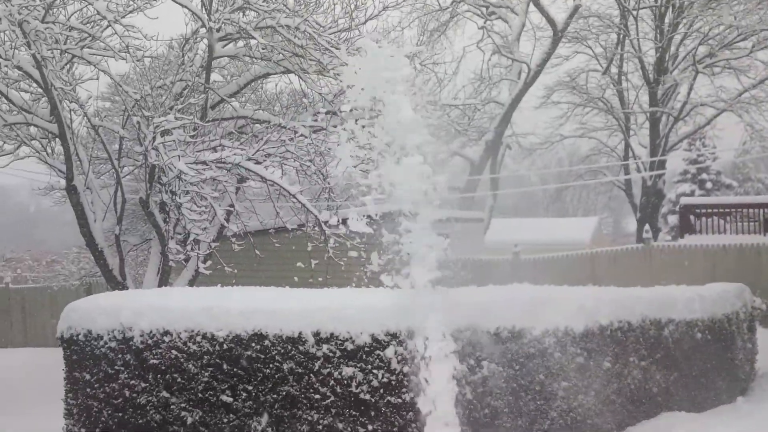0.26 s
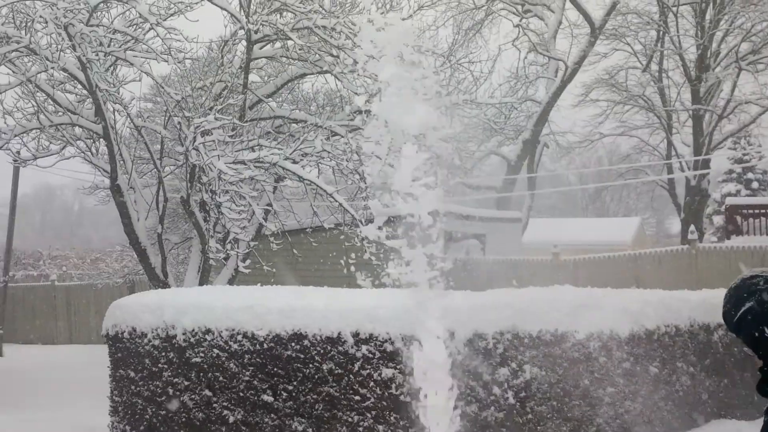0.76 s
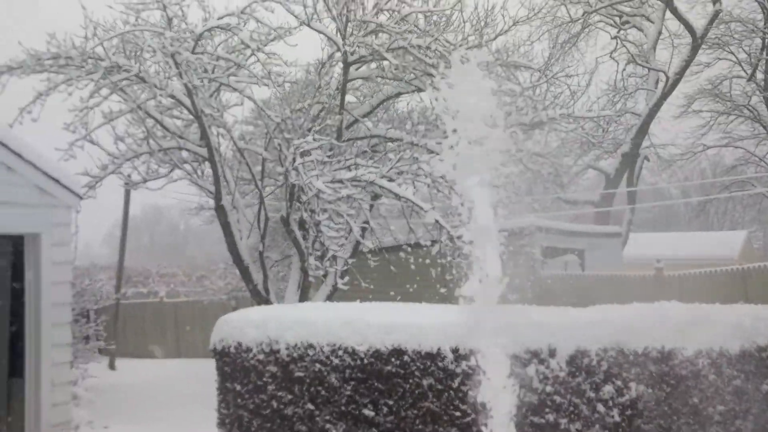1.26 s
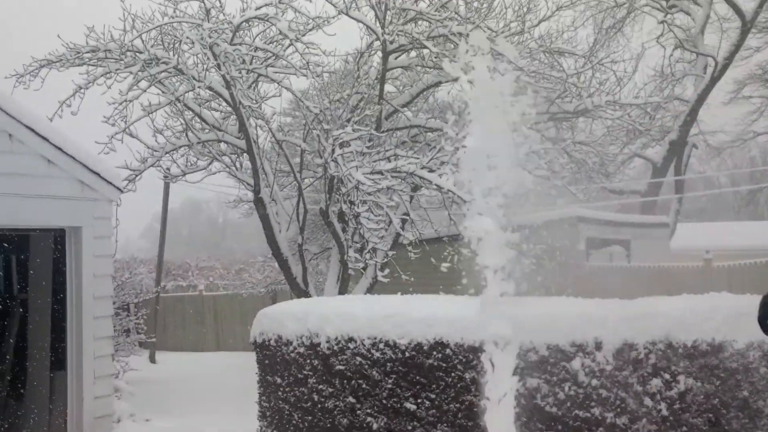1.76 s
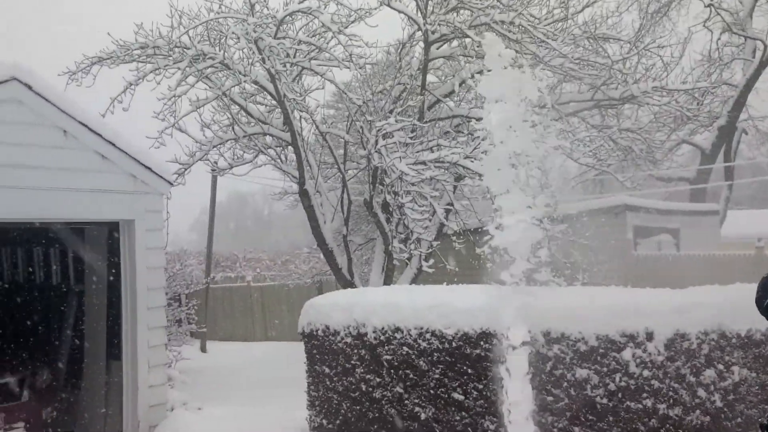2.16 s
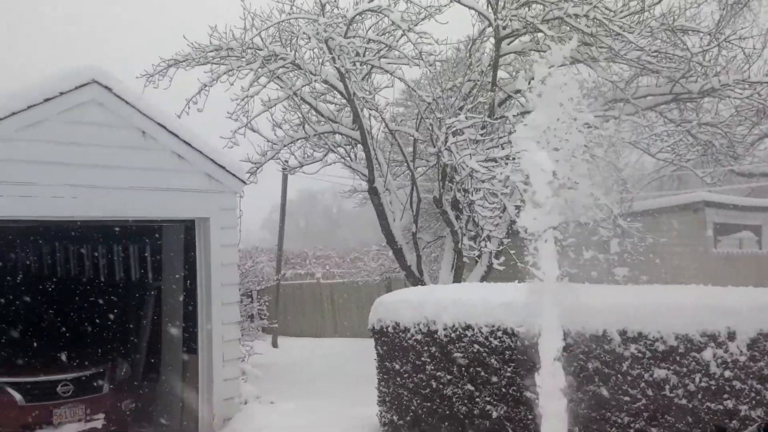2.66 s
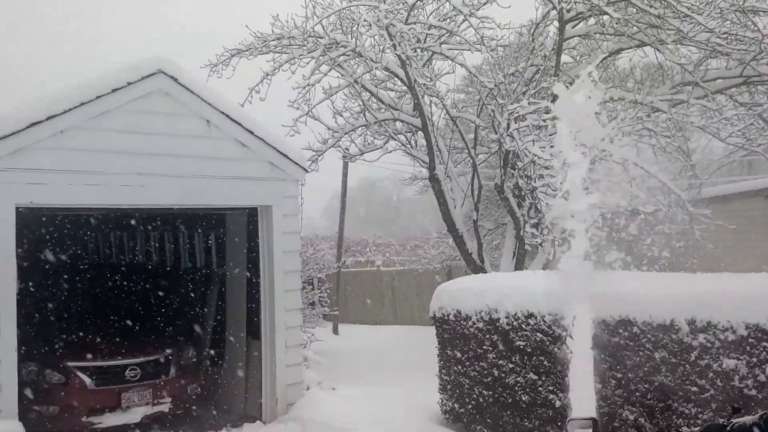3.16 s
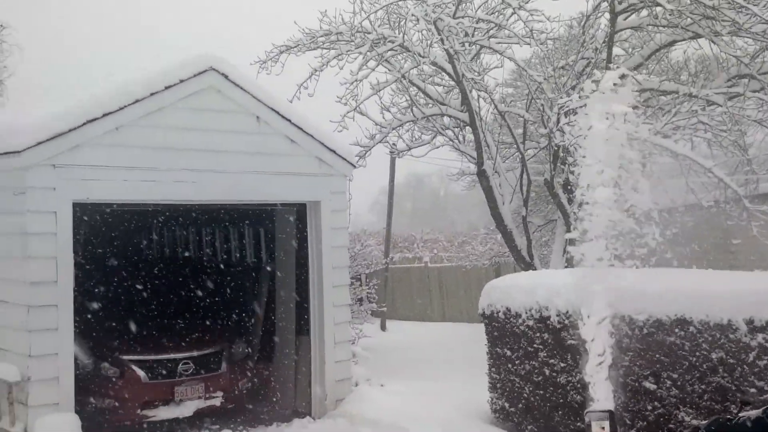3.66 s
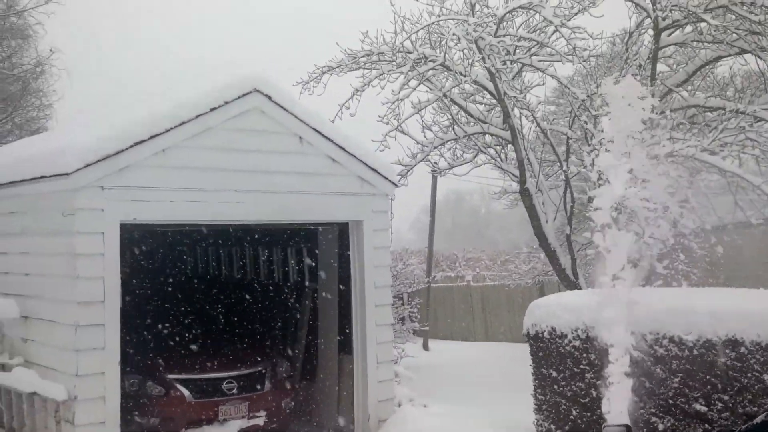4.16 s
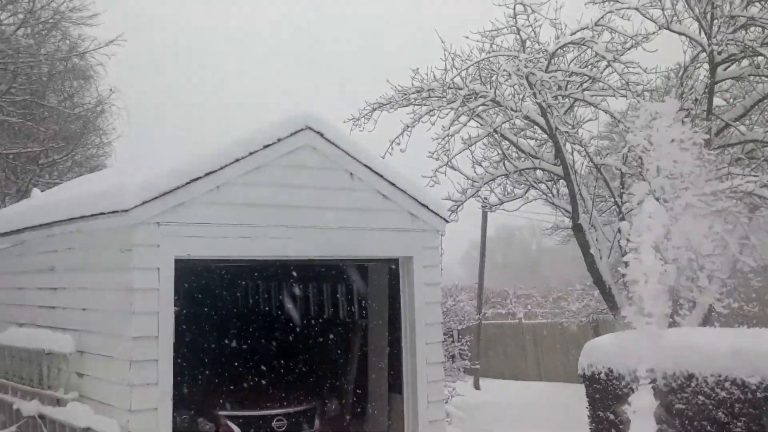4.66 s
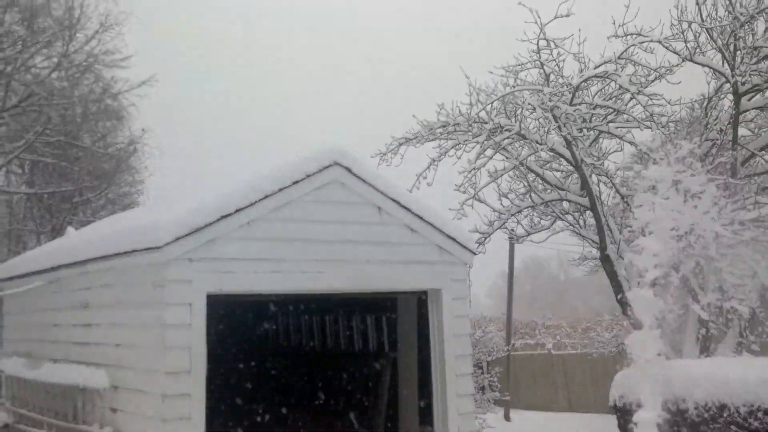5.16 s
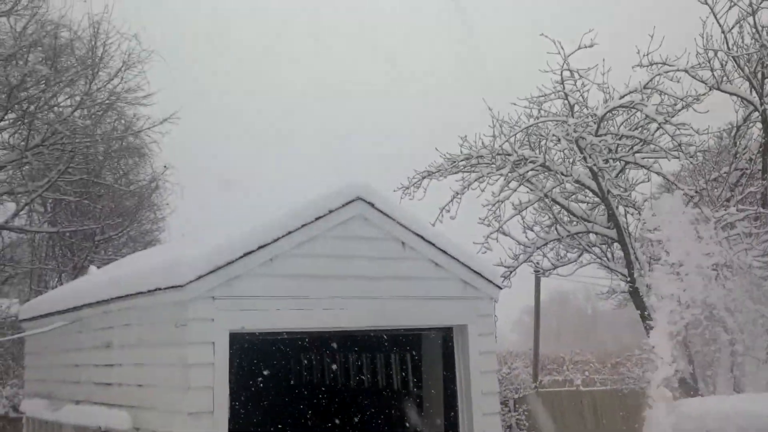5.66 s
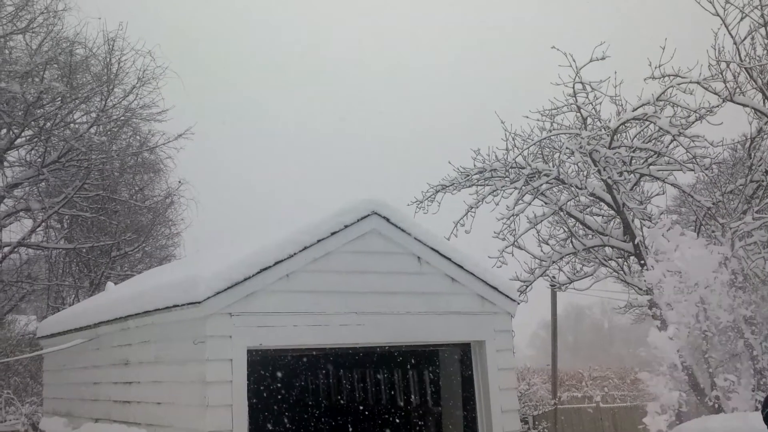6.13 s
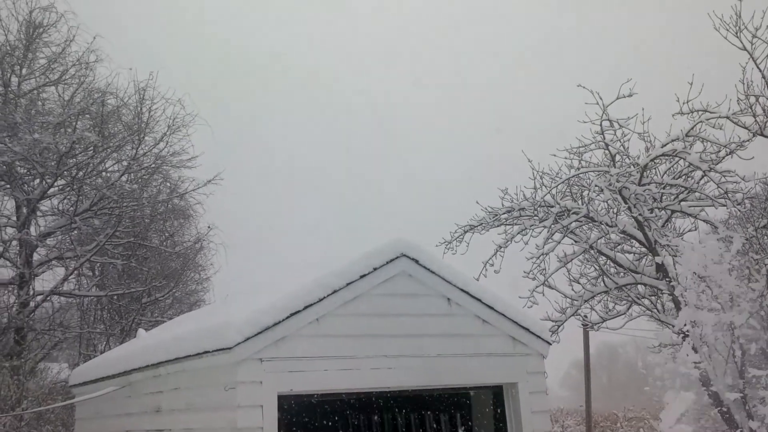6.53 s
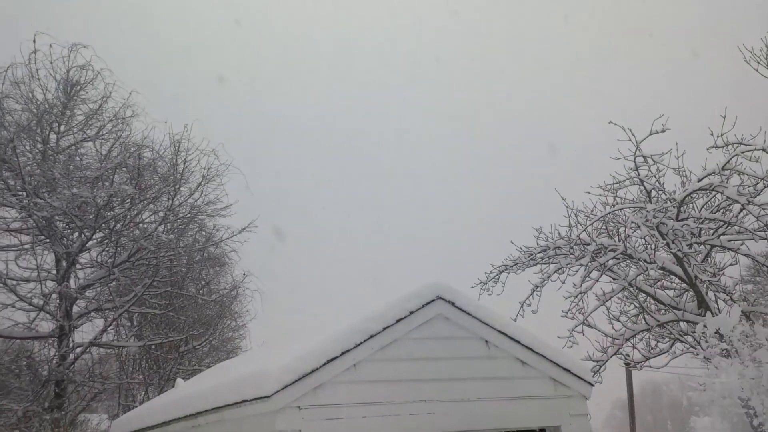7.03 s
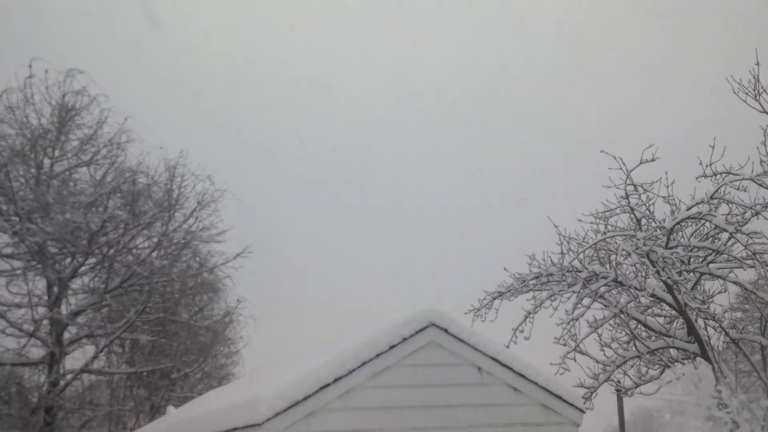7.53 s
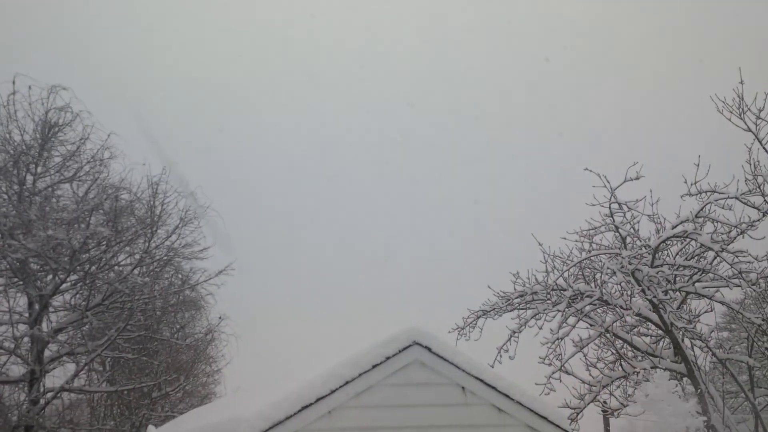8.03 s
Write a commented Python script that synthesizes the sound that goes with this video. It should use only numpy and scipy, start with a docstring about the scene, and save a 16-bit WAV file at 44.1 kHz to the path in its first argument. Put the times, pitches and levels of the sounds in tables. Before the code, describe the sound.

From 0 to 8.3 seconds a small one-cylinder petrol snowblower runs without a break at about 3500 revolutions per minute, roughly 29 exhaust beats per second, merging into a rough buzzing drone with strong low harmonics. Over it lie a pulsing roar of gas and thrown snow, hollow muffler ringing, tailpipe pops, loose casing clatter, midrange hiss and very faint high fizz. In the first two seconds irregular hard knocks and metallic clangs poke out; low rumble swells near 0.5 and 2.2. Around 3.9 and 4.1 seconds clumps of snow bump the right microphone with loud dull thuds. From 4 to 6 seconds the hand-held phone turns away: tone shifts, tailpipe pops weaken then return near the end, and the level sinks gradually, about five decibels overall. Tiny crisp snow ticks are scattered throughout. The engine sits left of centre, outdoors, and is still running at the end.

```python
"""Snowblower in a snowy yard

A one-cylinder four-stroke machine works beside a hand-held phone that slowly turns away.
The exhaust thumps once in two turns as a harmonic series; pulses and knocks ring modes of muffler, casing
and covers; shaped noise makes the roar of gas and snow, the hiss, a wavering low rumble and the fizz.
Grains of snow tick on the phone as band-passed bursts; clumps push the diaphragm of its right port."""
import sys
import numpy as np
from scipy import signal
from scipy.io import wavfile
from scipy.ndimage import uniform_filter1d

SR = 44100
rng = np.random.default_rng(int(sys.argv[2]) if len(sys.argv) > 2 else 0)


def output_pcm(signal):
    """Save a mono or channel-first signal as 16-bit PCM at the path in sys.argv[1].

    Samples are clipped to [-1, 1] before scaling.
    """
    pcm = np.clip(np.atleast_2d(signal).T, -1, 1) * 32767
    wavfile.write(sys.argv[1], SR, np.round(pcm).astype(np.int16))


N = 365588
T = np.arange(N) / SR

# crank speed: time_s, speed_rpm
CRANK_SPEED = [(0.0, 3415.9), (0.31, 3508.3), (0.73, 3544.0), (0.83, 3484.4), (1.32, 3521.3),
               (1.93, 3515.7), (2.33, 3535.2), (2.97, 3532.7), (3.55, 3517.5), (3.86, 3556.6),
               (4.03, 3477.5), (4.38, 3524.8), (5.13, 3518.4), (6.35, 3539.8), (7.03, 3535.5),
               (7.43, 3548.3), (8.3, 3545.2)]
FIRST_CYCLE = .567  # share of a cycle gone since the last exhaust pulse at 0 s
# engine loudness: time_s, level_db
ENGINE_LEVEL = [(0, -18), (1.4, -18.5), (2.5, -19.5), (3.8, -20), (4.1, -21), (5.2, -21), (6.7, -22.5),
                (8.3, -23.5)]
# turning of the phone: time_s, share_turned_away (0-1)
TURN_AWAY = [(0, 0.02), (2, 0), (4, 0.15), (6, 0.75), (8.3, 0.75)]

# exhaust thump, facing and away: multiple_of_firing_rate, level_db
THUMP_NEAR = [(1, -14), (2, -6), (3, -15), (4, 0), (5, -3), (6, -14), (7, -15), (8, -12), (9, -16)]
THUMP_AWAY = [(1, -15), (2, -5), (3, -13), (4, 0), (5, -4), (6, -13), (7, -12), (8, -8), (9, -14)]
# upper shaft orders that hum: multiple_of_firing_rate
HUM_ORDERS = [10, 11, 15, 16, 18, 20, 21, 22, 24, 26, 27, 29, 30, 44]
# their levels, row for row: facing_db, away_db
HUM_LEVELS = [(-13.5, -17.5), (-28, -21.5), (-18, -26.5), (-17, -24.5), (-15, -26.5), (-21.5, -26.5),
              (-30.5, -17.5), (-19.5, -19.5), (-25.5, -24.5), (-32.5, -11), (-19.5, -43), (-18.5, -29.5),
              (-24, -24.5), (-22, -24)]
# modes of muffler and sheet metal: pitch_hz, t60_s, facing_db, away_db
MUFFLER_MODES = [(459, .06, -21, -37), (528.5, .075, -21, -29), (639.5, 0.052, -23.5, -25),
                 (758, .045, -25, -21), (890, 0.049, -23, -22.5)]
FIRING_SHARE = .3  # size of the firing stroke's blow on the muffler beside the exhaust pulse
PIPE_HZ, PIPE_T60_S, PIPE_SPREAD_DB = 1300, .028, 2.2  # tailpipe pop before detuning, and its unevenness
# tailpipe pop: time_s, level_db
PIPE_LEVEL = [(0, -9.5), (1.5, -7.5), (2.5, -7), (4, -8.5), (4.6, -12.5), (6, -23), (8.3, -9)]
DETUNE = .014  # share by which loose sheet metal rings sharp or flat from stroke to stroke

# roar spectrum, facing and away: frequency_hz, relative_level_db (per Hz)
ROAR_NEAR = [(38, -30), (65, -21), (129, -11), (194, -9.5), (288, -2), (389, -21), (452, -12), (525, -5),
             (578, -9), (871, -9.5), (1130, -14.5), (1310, -16.5), (1480, -24), (1700, -18), (2210, -57.5),
             (3740, -120)]
ROAR_AWAY = [(38, -34), (65, -18.5), (134, -2.5), (189, -8), (265, -7.5), (394, -34.5), (465, -8),
             (555, -14.5), (636, 3), (709, -26), (770, -9), (984, -21.5), (1390, -12), (1700, -31),
             (2210, -70.5), (3740, -120)]
# valve and piston knocks: share_of_cycle (after the exhaust pulse), level_db, tilt_db_per_octave
KNOCKS = [(.1, -3, -7), (.22, -7, -2), (.36, -6, -4), (.54, -4, -12), (.62, -3, -3), (.67, 0, 0),
          (.72, 0, 4), (.8, -6, 6), (.95, -7, 3)]
# casing modes: pitch_hz, base_t60_s, facing_db, away_db
CASING_MODES = [(1640, .025, -4, -12), (1790, .028, -2, -10), (1955, .032, 0, 1), (2230, .02, -7, -19),
                (2519, .034, -4, -2), (2700, .022, -7, -16), (3050, .02, -12, -20), (3248, .032, -8.5, -7),
                (3450, .022, -11, -19), (3640, .036, -12, -9)]
# casing ring within the clatter: time_s, level_db
CASING_LEVEL = [(0, -3), (1.8, -3), (2.2, -5), (3.6, -5), (4.1, -1.5), (5.4, -1.5), (6, -3), (8.3, -3)]
# hiss spectrum, facing and away: frequency_hz, relative_level_db (per Hz)
HISS_NEAR = [(1100, -32), (1500, -4), (2000, 1.5), (2280, -2.5), (2500, -5), (2900, -11), (3200, -9),
             (3650, -13.5), (3950, -24), (4300, -25), (4700, -51)]
HISS_AWAY = [(1100, -30.5), (1500, -21), (1950, 5.5), (2200, -9), (2500, 4.5), (2900, -11.5), (3200, -2),
             (3650, -12), (3950, -23.5), (4300, -28.5), (4700, -47.5)]
# low rumble relative to the engine: time_s, level_db
RUMBLE_LEVEL = [(0, -10.5), (.3, -10.5), (.55, -6.5), (.9, -8.5), (1.4, -12), (1.9, -11.5), (2.2, -6),
                (2.5, -8), (2.8, -15.5), (3.6, -13.5), (4.5, -13.5), (6, -17), (7.2, -13.5), (8.3, -14.5)]
RUMBLE_WAVER_DB = 2  # slow random waver, rms
# fizz spectrum, facing and away: frequency_hz, relative_level_db (per Hz)
FIZZ_NEAR = [(3000, -41.5), (3900, -2.5), (4700, -3.5), (5150, -2.5), (5450, -0.5), (5750, -1),
             (6100, -3.5), (6900, -4.5), (7500, -18.5), (8300, -8.5), (9500, -16.5), (10300, -31.5),
             (12600, -33.5), (13600, -59.5)]
FIZZ_AWAY = [(3000, -24.5), (3900, 2.5), (4700, 1), (5150, -0.5), (5450, 6.5), (5750, -2), (6100, -0.5),
             (6900, -10.5), (7500, -23.5), (8300, -21), (9500, -27), (10300, -21), (12600, -29),
             (13600, -60.5)]
# modes of the thin covers: pitch_hz, t60_s, level_db
COVER_MODES = [(4700, 0.024, -15), (5460, 0.095, 0), (6760, 0.023, -1), (8220, 0.0069, 5)]
# time_s, clatter_db and fizz_db (relative to the engine), treble_db (highest treble within the fizz)
BRIGHTNESS = [(0, -20, -45, 2.5), (1.9, -19.5, -45, 2.5), (2.1, -18.5, -46, -4), (2.6, -18.5, -47, 1.5),
              (3.6, -16.5, -44, 3.5), (3.9, -19.5, -47.5, 2), (4.7, -20.5, -46.5, -1.5),
              (6, -22, -47, -0.5), (8.3, -23, -46.5, 2.5)]
TREBLE_HZ = 7500

# outstanding knocks of the firing stroke: start_s, level_db (relative to the engine)
HARD_KNOCKS = [(0.039, -25), (.178, -36), (.419, -28), (.487, -28), (0.522, -27), (0.931, -21.5),
               (.965, -27), (1.067, -26), (1.136, -26), (1.272, -25), (1.375, -27), (1.614, -27),
               (3.282, -29)]
HARD_TILT_DB = 18  # per octave, favours the upper cover modes
HIGH_NOISE_DB, HIGH_NOISE_T60_S, HIGH_NOISE_RISE_S = 0, 0.027, 0.0072
# strokes that clang on the casing: start_s, peak_db (before the port balance)
CLANGS = [(0.138, -34), (0.2129, -37), (0.381, -32), (0.687, -31), (0.8569, -43), (0.9297, -26),
          (0.9637, -40), (1.027, -30.5), (1.1687, -31), (1.3017, -27), (1.3757, -30), (1.4076, -30),
          (1.4426, -38), (1.5798, -43), (1.8142, -36), (1.9499, -31), (2.0534, -25.5), (3.5149, -46),
          (3.991, -30.5), (4.0277, -31), (4.1659, -31), (4.2028, -38), (4.335, -33), (4.4029, -33),
          (4.6742, -30), (5.1222, -31), (5.7627, -32)]
CLANG_TILT_DB = 17  # per octave, favours the upper casing modes

# grains of snow on the phone, and at 3.888 s the broadband click of the clump that strikes the right port:
# centre_s, level_db, pitch_hz, spread_octaves, left_right_db
GRAINS = [(.986, -56, 9500, .5, -5), (1.002, -46, 11000, .9, -5), (1.008, -52, 9500, .7, -5),
          (1.294, -42, 10500, 1, 2), (1.308, -50, 10700, .4, 10), (3.092, -61, 10000, .8, 5),
          (3.112, -53, 11300, 0.22, 9), (3.888, -48, 8000, 1.6, -6), (4.765, -43, 9350, 0.47, -12),
          (4.923, -56, 12000, .9, -4), (5.266, -45, 7740, .9, -6), (5.293, -62, 8500, 0.32, -3),
          (6.329, -54, 9930, 0.44, -6), (6.856, -54, 8550, 0.19, -7), (6.866, -51, 10500, 0.37, -7),
          (6.872, -59, 10000, .5, -3), (6.882, -59, 10500, .6, -1), (7.767, -51, 10800, .6, 2),
          (8.204, -53, 10300, 0.55, -4)]
# Gaussian widths of the tick and of the soft faint noise, mostly after it
TICK_S, FAINT_NOISE_S, FAINT_NOISE_DB = .0014, .009, -17
# clumps on the right port: start_s, level_db, rise_s (scale of the push), shell_db (ring of the phone shell)
TAPS = [(3.8856, -7, .0003, -38), (3.8874, -.5, .00013, -29), (4.1312, -11, .0004, -31),
        (4.1336, -.5, .00015, -20.5)]
# phone shell modes: pitch_hz, t60_s, level_db
SHELL_MODES = [(2720, .007, -11), (3270, .014, -2.5), (3720, .009, -9), (5340, .006, -19),
               (7000, .005, -26), (9000, .005, -26), (11500, .005, -26)]

# level of the left port over the right, facing and away: frequency_hz, left_right_db
LEAN_NEAR = [(60, 2.42), (160, 4.5), (300, 7.64), (530, 8.8), (830, 13.99), (1280, 10.98), (1980, 4.05),
             (3060, 7.85), (6000, 5.83), (9000, 3.8)]
LEAN_AWAY = [(60, 2), (160, 2.5), (300, 8.9), (530, 14.8), (830, 7), (1280, 7.1), (1980, 4.6), (3060, 6.7),
             (6000, 7), (9000, 3.2)]
# likeness of the noise at the two ports: frequency_hz, likeness (0-1)
LIKENESS = [(30, .8), (100, .88), (400, .96), (1000, .87), (2000, .85), (4000, .55), (7000, .35),
            (11000, .5)]
RIGHT_LAG_S = 0.000096
BASS_LAG_RAD, BASS_LAG_HZ = 0.45, 200  # the right port trails further in the bass
EDGE_HZ = 15800  # upper band limit


def gain_of(db):
    """Decibel law: 20 dB is a factor of ten in amplitude."""
    return 10 ** (np.asarray(db) / 20)


def evened(x):
    """Power normalisation: scales a signal to rms 1."""
    return x / np.sqrt(np.mean(x ** 2) + 1e-20)


def curve(rows, t, column=1):
    """Linear interpolation of one table column at the times t."""
    rows = np.array(rows)
    return np.interp(t, rows[:, 0], rows[:, column])


def read(points, hz):
    """Spectral interpolation on a logarithmic frequency axis."""
    f, value = np.transpose(points)
    return np.interp(np.log(hz + 1), np.log(f + 1), value)


def turned(near, away, t):
    """Directivity: blends the facing and away values as the phone turns."""
    share = np.clip(curve(TURN_AWAY, t), 0, 1)
    return (1 - share) * near + share * away


def drift(size):
    """Slow random modulation: twice-smoothed noise of rms 1."""
    slow = uniform_filter1d(rng.standard_normal(N), size=size)
    return evened(uniform_filter1d(slow, size=size))


def noise(near, away, patchy_db):
    """Turbulent noise: random short-time spectra, shaped in frequency and patchy in time, of rms 1."""
    frames, hz = N // 256 + 5, np.fft.rfftfreq(1024, 1 / SR)[:, None]
    real, imaginary, patches = rng.standard_normal((frames, 513, 3)).T
    patches = uniform_filter1d(patches, size=5, axis=0)
    patches = evened(uniform_filter1d(patches, size=12, axis=1))
    frame_s = np.arange(frames) * 256 / SR
    shape = gain_of(turned(read(near, hz), read(away, hz), frame_s))
    # equal power in every frame before the patches
    shape = shape / np.sqrt((shape ** 2).mean(0)) * gain_of(patchy_db * patches)
    spectra = (real + 1j * imaginary) * shape
    return evened(signal.istft(spectra, nperseg=1024, noverlap=768)[1][:N])


def ring(hz, t60, cycles=2):
    """Damped resonance: one struck mode decays exponentially after a soft blow of a few cycles."""
    t = np.arange(6000) / SR
    onset = np.sin(np.pi / 2 * np.minimum(t * hz / cycles, 1)) ** 2
    return gain_of(-60 * t / t60) * np.sin(2 * np.pi * hz * t) * onset


def blows(cycle, share, spread_db, jitter):
    """Periodic impulses: one click a cycle at the given share, uneven in time (in cycles) and size."""
    turns = np.arange(int(cycle[-1]))
    late, size = rng.standard_normal((len(turns), 2)).T
    at = np.searchsorted(cycle, turns + share + jitter * late)
    return np.bincount(np.minimum(at, N - 1), gain_of(spread_db * size), N)


def throb(cycle, share, sharp):
    """Amplitude modulation: a smooth swell once a cycle, with a top of 1."""
    return np.exp(sharp * (np.cos(2 * np.pi * (cycle - share)) - 1))


def stroke_of(cycle):
    """Counts the engine cycles, changing number a quarter of a cycle after the exhaust pulse."""
    return (cycle + .75).astype(int)


def swell(cycle):
    """Gas flow noise: it swells unevenly at the firing stroke and, more broadly, about as strongly at the exhaust."""
    strength = gain_of(1.7 * rng.standard_normal(int(cycle[-1]) + 2))[stroke_of(cycle)]
    return strength * throb(cycle, 0.69, sharp=3.9) + 1.3 * throb(cycle, 1.0, sharp=2.2)


def detuned(train, cycle, hz, t60):
    """Loose resonance: rings one mode flat, true or sharp, chosen anew for each stroke."""
    stroke = stroke_of(cycle)
    pick = rng.integers(-1, 2, stroke[-1] + 1)[stroke]
    return sum(signal.oaconvolve(train * (pick == k), ring(hz * (1 + DETUNE * k), t60, cycles=3.3))[:N]
               for k in (-1, 0, 1))


def rattle(cycle, modes):
    """Modal excitation: knocks ring every mode by chance, so each stroke has its own colour."""
    trains = [blows(cycle, share, spread_db=1.5, jitter=.007) for share, _, _ in KNOCKS]
    stroke = stroke_of(cycle)
    out = np.zeros(N)
    for hz, t60, *db in modes:
        octaves = min(np.log2(hz / 2500), .5)
        knocks = sum(gain_of(level_db + tilt_db * octaves) * train
                     for (_, level_db, tilt_db), train in zip(KNOCKS, trains))
        colour = gain_of(1.2 * rng.standard_normal(stroke[-1] + 1))[stroke]
        uneven = colour * gain_of(1.5 * rng.standard_normal(N)) * rng.choice([-1, 1], N)
        # a single level column serves both facing and away
        out += gain_of(turned(db[0], db[-1], T)) * detuned(knocks * uneven, cycle, hz, t60)
    return evened(out)


def thump(cycle):
    """Harmonic series of the firing rate: all partials swell with the charge, upper ones waver more alone."""
    out = np.zeros(N)
    for (k, near_db), (_, away_db) in zip(THUMP_NEAR, THUMP_AWAY):
        # phases of a suction pulse; the upper multiples come a little earlier
        lead = k - 6.25 if k > 6 else 3.9 if k < 3 else 2.95
        level_db = turned(near_db, away_db, T) + 0.15 * k * drift(size=2500)
        out += gain_of(level_db) * np.cos(2 * np.pi * k * cycle + lead)
    running_rms = np.sqrt(uniform_filter1d(out ** 2, size=30000))
    return gain_of(0.13 * drift(size=1500)) * out / running_rms


def hum(cycle):
    """Shaft-order tones: thin lines locked to the exhaust pulse waver slowly in level and phase."""
    out = np.zeros(N)
    for k, (near_db, away_db) in zip(HUM_ORDERS, HUM_LEVELS):
        level_db = turned(near_db, away_db, T) + 2.3 * drift(size=2500)
        out += gain_of(level_db) * np.sin(2 * np.pi * k * cycle + 0.6 * drift(size=2000))
    return out


def muffler(cycle):
    """Impulse-driven resonance: exhaust pulses ring the muffler, and more weakly the firing stroke between."""
    pulses = blows(cycle, 0.99, spread_db=1.3, jitter=0.00078)
    pulses = pulses + FIRING_SHARE * blows(cycle, .62, spread_db=6.5, jitter=0.019)
    return sum(gain_of(turned(near_db, away_db, T)) * signal.oaconvolve(pulses, ring(hz, t60))[:N]
               for hz, t60, near_db, away_db in MUFFLER_MODES)


def tailpipe(cycle):
    """Pipe resonance: a short uneven pop near each exhaust pulse, and a weaker one about half a cycle later."""
    pops = blows(cycle, 0.95, spread_db=PIPE_SPREAD_DB, jitter=0.0066)
    pops = pops + 0.56 * blows(cycle, .47, spread_db=0.5, jitter=.02)
    return gain_of(curve(PIPE_LEVEL, T)) * detuned(pops, cycle, PIPE_HZ, PIPE_T60_S)


def roar(cycle):
    """Modulated turbulence: the roar of gas and snow swells once a cycle, after each exhaust pulse."""
    return noise(ROAR_NEAR, ROAR_AWAY, patchy_db=1.2) * (0.68 + 0.16 * throb(cycle, 0.14, sharp=0.97))


def clatter(cycle):
    """Struck plates over flow noise: the casing rings above a swelling hiss."""
    hiss = noise(HISS_NEAR, HISS_AWAY, patchy_db=3.0) * (2.9 + swell(cycle))
    return gain_of(curve(CASING_LEVEL, T)) * rattle(cycle, CASING_MODES) + gain_of(-3.2) * evened(hiss)


def rumble(cycle):
    """Band-limited noise: a low rumble that swells once a cycle."""
    band = signal.butter(2, [90, 300], "band", fs=SR, output="sos")
    low = signal.sosfilt(band, rng.standard_normal(N))
    return evened(low * (1.5 + throb(cycle, 0.67, sharp=0.71)))


def fizz(cycle):
    """Struck covers and high flow noise: thin covers tick over a fizz whose top treble varies in level."""
    gas = noise(FIZZ_NEAR, FIZZ_AWAY, patchy_db=5.0) * (0.62 + swell(cycle))
    mix = gain_of(-2.0) * rattle(cycle, COVER_MODES) + gain_of(9.0) * evened(gas)
    high_pass = signal.firwin(101, TREBLE_HZ, pass_zero=False, fs=SR)
    treble = signal.oaconvolve(mix, high_pass, "same")
    return mix + (gain_of(curve(BRIGHTNESS, T, column=3)) - 1) * treble


def hard_knocks():
    """Modal response to a hard blow: the thin covers ring brightly with a little soft high noise."""
    t, out = np.arange(6000) / SR, np.zeros(N + 6000)
    covers = sum(gain_of(db + HARD_TILT_DB * np.log2(hz / 6000)) * ring(hz, t60, cycles=12.)
                 for hz, t60, db in COVER_MODES)
    envelope = gain_of(HIGH_NOISE_DB - 60 * t / HIGH_NOISE_T60_S) * np.minimum(t / HIGH_NOISE_RISE_S, 1)
    for s, db in HARD_KNOCKS:
        high_noise = envelope * np.diff(rng.standard_normal(6001))  # differencing brightens the noise
        out[round(s * SR):][:6000] += gain_of(db) * (covers + high_noise)
    return out[:N]


def clangs():
    """Modal superposition: single strokes ring all casing modes together, longer than the clatter does."""
    s, db = np.transpose(CLANGS)
    hits = np.bincount((s * SR).astype(int), gain_of(db), N)
    sound = sum(gain_of(level_db + CLANG_TILT_DB * np.log2(hz / 3400)) * ring(hz, 1.9 * t60, cycles=7.)
                for hz, t60, _, level_db in CASING_MODES)
    return signal.oaconvolve(hits, sound / abs(sound).max())[:N]


def snow_grains():
    """Impact noise: each grain is a band-passed burst, a brief tick with soft faint noise mostly after it."""
    out, t = np.zeros((2, N + 6000)), np.arange(2000) / SR
    s, size, pitch, pan = rng.random((30, 4)).T
    # thirty further faint grains fall at random
    faint = zip(.03 + s * (N / SR - .03), -68. + 5.4 * size, 8000 + 5000 * pitch,
                .2 + .5 * size, 16. * (pan - .4))
    middle = t - 1000 / SR
    tick = np.exp(-(middle / TICK_S) ** 2)
    shape = tick + gain_of(FAINT_NOISE_DB) * np.exp(-(middle / FAINT_NOISE_S - .5) ** 2)
    for s, db, hz, octaves, pan_db in [*GRAINS, *faint]:
        edges = np.minimum(hz * 2. ** (np.array([-.5, .5]) * max(octaves, .1)), 20000)
        band = signal.butter(2, edges, "band", fs=SR, output="sos")
        # mostly common to both ports
        grit = rng.standard_normal((2, 2000)) * 0.37 + rng.standard_normal(2000)
        crackle = evened(signal.sosfilt(band, grit))
        level = gain_of(db + np.array([[.5], [-.5]]) * pan_db)
        out[:, round(s * SR) - 1000:][:, :2000] += level * crackle * shape
    return out[:, :N]


def snow_taps():
    """Diaphragm displacement: clumps push the right port, which swings back while the shell rings."""
    out, t = np.zeros((2, N + 6000)), np.arange(2000) / SR
    swing = (t / .0015) ** 2 * np.exp(-t / .0015)
    shell = sum(gain_of(db) * ring(hz, t60) for hz, t60, db in SHELL_MODES)
    for s, db, rise, shell_db in TAPS:
        push = (t / rise) ** 3 * np.exp(-t / rise)
        out[1, round(s * SR):][:2000] += gain_of(db) * (push / push.max() - .18 * swing / swing.max())
        out[:, round(s * SR):][:, :6000] += gain_of(shell_db) * shell
    return out[:, :N]


def machine():
    """Superposition of sources: the steady part, the noisy part, and the noisy part as the yard scatters it."""
    cycle = FIRST_CYCLE + np.cumsum(curve(CRANK_SPEED, T)) / (120 * SR)  # two turns a cycle
    clatter_gain = gain_of(curve(BRIGHTNESS, T, column=1))
    fizz_gain = gain_of(curve(BRIGHTNESS, T, column=2))
    rumble_gain = gain_of(curve(RUMBLE_LEVEL, T) + RUMBLE_WAVER_DB * drift(size=5000))
    steady = gain_of(-1.0) * thump(cycle) + hum(cycle)
    steady = steady + gain_of(9.5) * (muffler(cycle) + tailpipe(cycle)) + hard_knocks()
    noisy = [gain_of(-4.0) * roar(cycle) + clatter_gain * clatter(cycle)
             + rumble_gain * rumble(cycle) + fizz_gain * fizz(cycle) for _ in range(2)]
    level = gain_of(curve(ENGINE_LEVEL, T))
    # dividing by the level keeps the clangs independent of it
    return level * np.array([steady + clangs() / level, *noisy])


def ports(layers):
    """Shading, delay and coherence: the phone body veils the right port, which also hears scattered sound."""
    hz, t, (clean, noisy, scattered) = signal.stft(layers, SR, nperseg=1024)
    hz = hz[:, None]
    alike = np.clip(read(LIKENESS, hz), 0, 1)
    shade = gain_of(-turned(read(LEAN_NEAR, hz), read(LEAN_AWAY, hz), t))
    bass_lag = BASS_LAG_RAD * np.exp(-hz / BASS_LAG_HZ)
    late = np.exp(-2j * np.pi * hz * RIGHT_LAG_S - 1j * bass_lag)
    right = shade * ((clean + alike * noisy) * late + np.sqrt(1 - alike ** 2) * scattered)
    both = np.array([clean + noisy, right]) * 2 / (1 + shade)  # balances the two ports
    return signal.istft(both, SR, nperseg=1024)[1][:, :N]


def scene():
    """Superposition: the machine through both ports, and the snow on the phone."""
    return ports(machine()) + snow_grains() + snow_taps()


def record(dry):
    """Band limitation: a linear-phase low-pass filter removes the highest treble."""
    low_pass = signal.firwin(511, EDGE_HZ, window=("kaiser", 9), fs=SR)
    return signal.oaconvolve(dry, low_pass[None], "same")


dry = scene()
out = record(dry)
output_pcm(out)
```